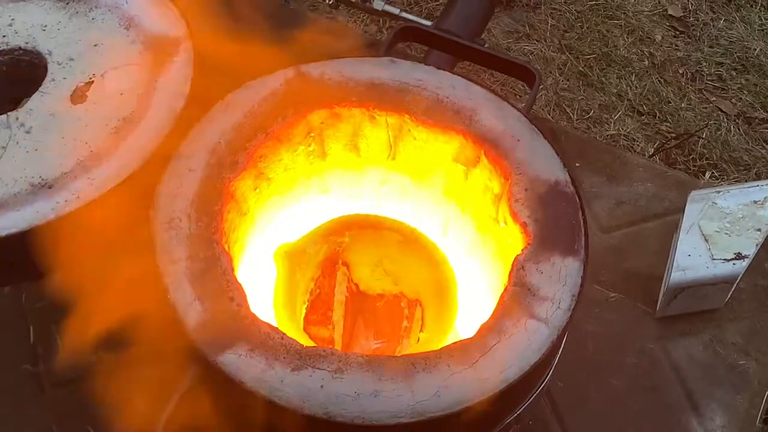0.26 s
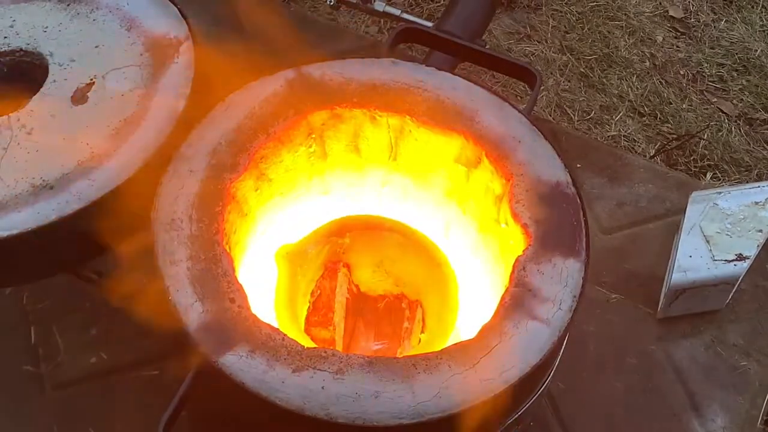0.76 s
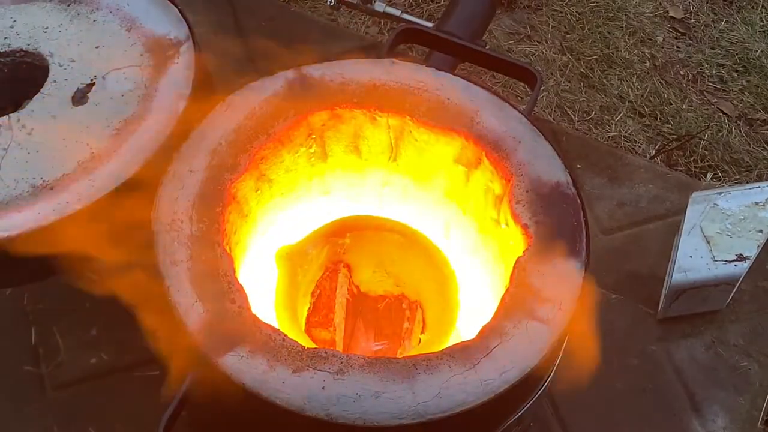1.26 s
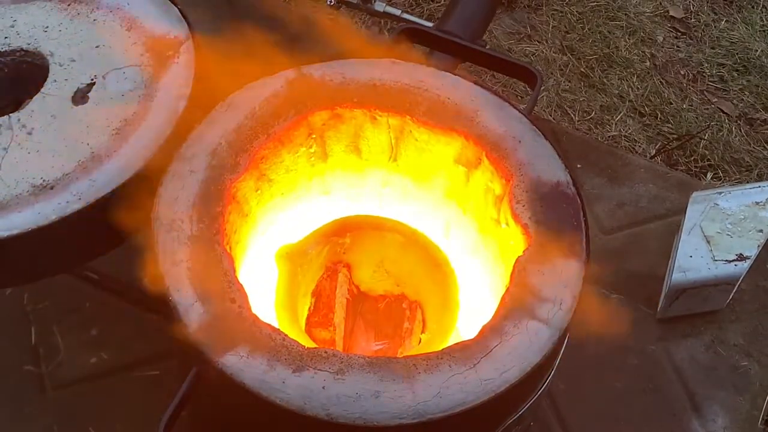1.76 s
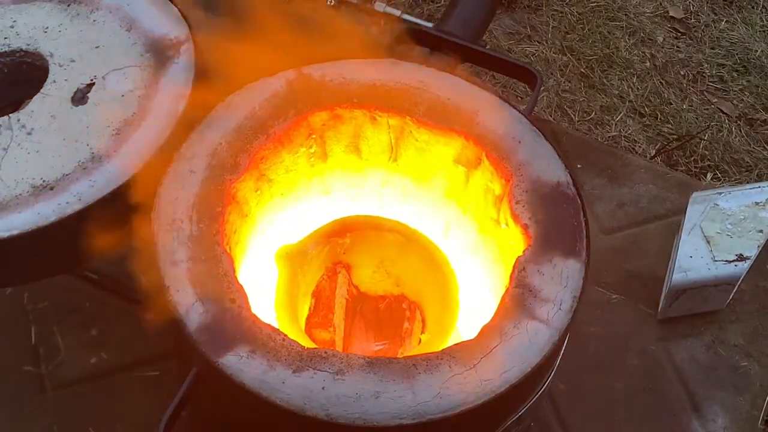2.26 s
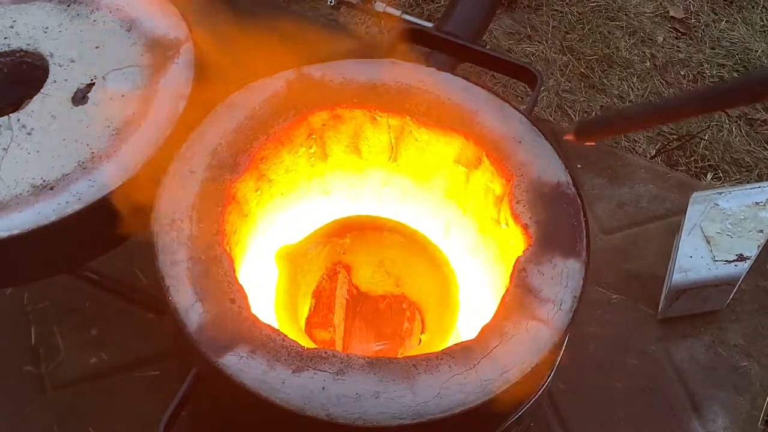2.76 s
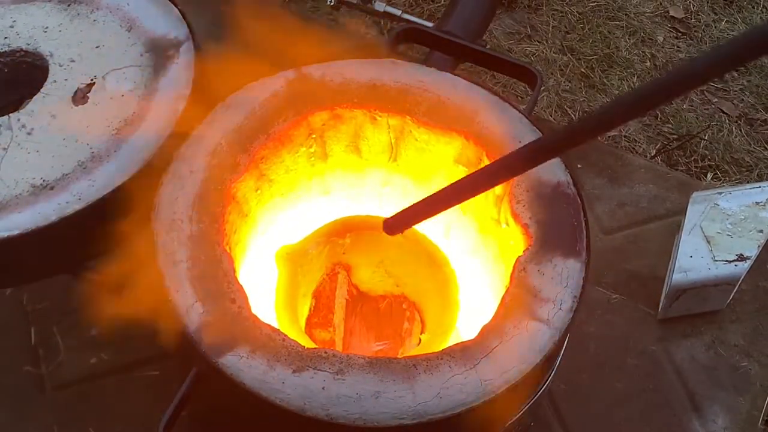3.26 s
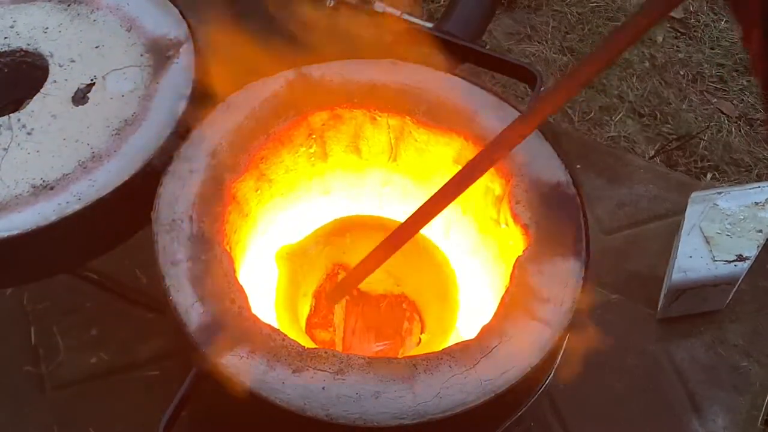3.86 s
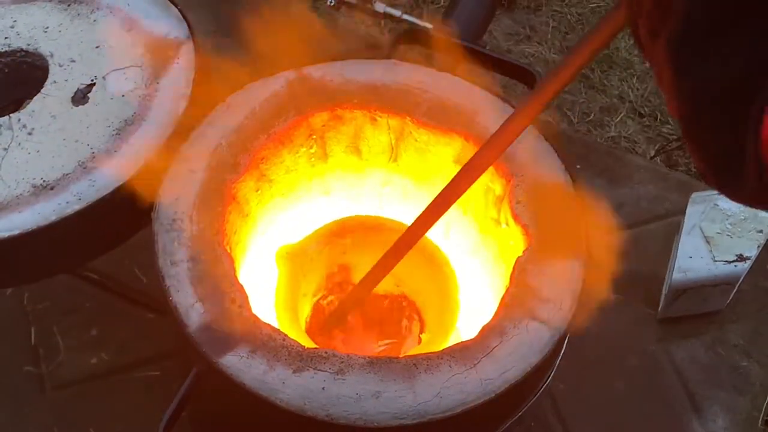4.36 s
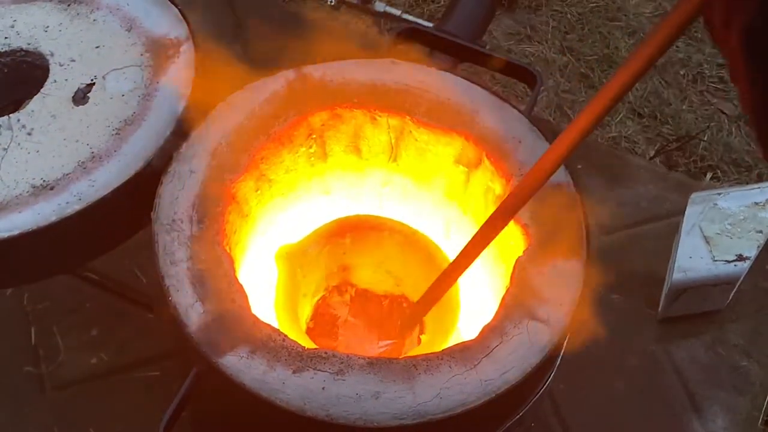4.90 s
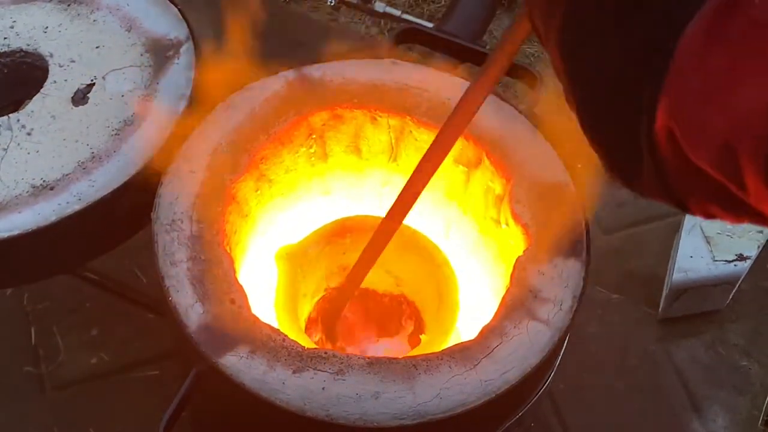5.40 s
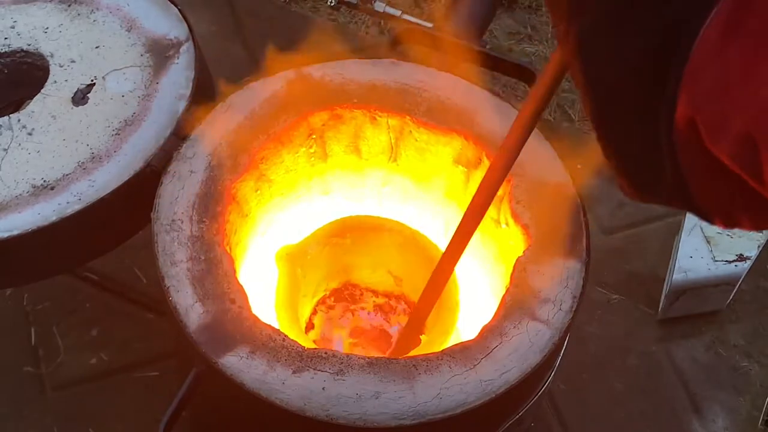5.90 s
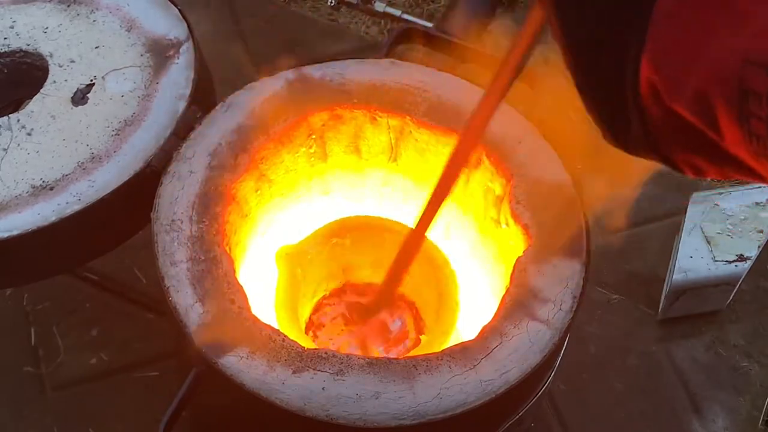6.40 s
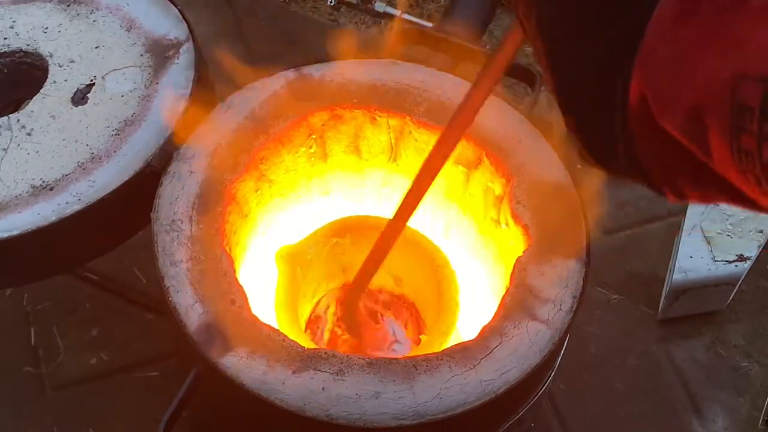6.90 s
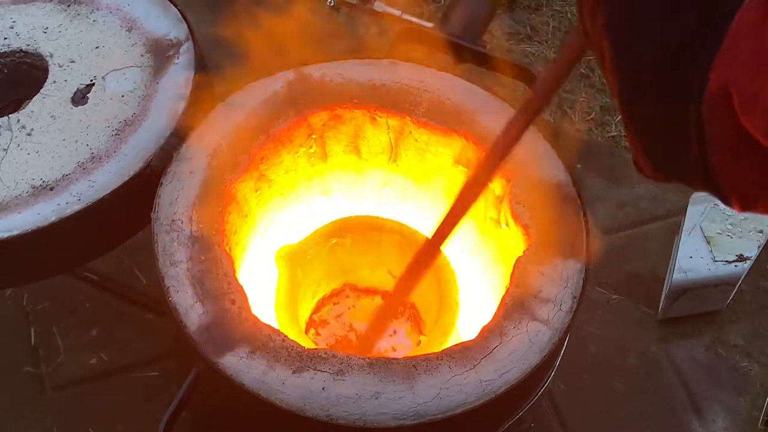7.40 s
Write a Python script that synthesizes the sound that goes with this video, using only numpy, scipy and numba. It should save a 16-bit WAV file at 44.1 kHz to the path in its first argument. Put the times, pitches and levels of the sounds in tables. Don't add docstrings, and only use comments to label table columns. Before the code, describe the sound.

A gas-fired pot furnace roars continuously for about 7.6 seconds in an open yard, heard very close from above in stereo with little surrounding space. The core is a broad, hollow low rush, strongest in the low and lower-middle range, wavering slightly but never stopping. From 0 to 2 seconds flame tips rustle over the rim in short gusts, with a notable puff near 0.9, and a bright, thin gas hiss with a very faint noisy whistle leans right. Around 2 seconds the rustle and hiss dip briefly, then recover. From about 3.8 to 5.2 seconds the hiss is shaded and duller, fluttering quickly as a worker's arm and rod cross. It reopens through 5.5 to 6.4, and rustling grows livelier, dips near 6.9, then swells fuller and brighter to the end, cutting off while still burning.

```python
import sys
import numpy as np
from scipy import signal
from scipy.fft import next_fast_len
from scipy.io import wavfile
from scipy.ndimage import uniform_filter1d, minimum_filter1d
from numba import njit

SR = 44100
rng = np.random.default_rng(int(sys.argv[2]) if len(sys.argv) > 2 else 0)


def digitize_waveform(pressure):
    field = np.atleast_2d(pressure).T
    bounded = np.clip(field, -1, 1)
    quanta = np.round(bounded * 32767).astype(np.int16)
    wavfile.write(sys.argv[1], SR, quanta)


def voltage_ratio(decibels):
    exponent = np.asarray(decibels, float) / 20
    return 10 ** exponent


N = 337310
HZ = np.maximum(np.fft.fftfreq(next_fast_len(N), 1 / SR), 0)

# [t/s, stretch of left port's lead, turn towards mouth 0-1]
SWING = [
    (0, 0.91, 0.02),
    (1.7, .8, .2),
    (2.7, 1.6, 0.9),
    (3.4, 1.3, 0.8),
    (4.8, 1.1, 0.9),
    (5.7, 1.3, 1),
    (6.5, 1, 1),
    (7.65, 0.9, .7),
]
# [t/s, jet lift (negative = shade)/dB]
SHADE = [(0, 3.5), (1.7, 0.5), (1.8, 0), (2.05, -4.5), (2.2, -0.5), (3.2, 1), (3.68, -3.5), (3.85, -11),
         (4.35, -12), (4.6, -11), (5.1, -10.5), (5.3, -7.5), (5.6, -5), (6.1, -3), (6.4, 0), (6.8, 1),
         (6.96, -3.5), (7.2, 0.5), (7.65, 0.5)]


def unit(x):
    return x / np.sqrt(np.mean(x ** 2))


def curves(table):
    t_s, *columns = np.transpose(table)
    return [np.interp(np.arange(N) / SR, t_s, c) for c in columns]


def over_hz(table):
    hz, *columns = np.transpose(table)
    return [np.interp(np.log(HZ + 1), np.log(hz), c) for c in columns]


def walk(rate_hz):
    hold = int(SR / rate_hz)
    steps = np.repeat(rng.standard_normal(N // hold + 1), hold)
    return unit(uniform_filter1d(uniform_filter1d(steps, hold), hold)[:N])


@njit
def ring(x, hz, width_hz):
    y, band, low = np.empty(len(x)), 0., 0.
    for i in range(len(x)):
        g, damping = np.tan(np.pi * hz[i] / SR), width_hz / hz[i]
        v = (band + g * (x[i] - low)) / (1 + g * (g + damping))
        band, low, y[i] = 2 * v - band, low + 2 * g * v, damping * v
    return y


def ports(gain, lead_rad, like, wander_rad):
    real, imag = rng.standard_normal((2, 3, len(HZ)))
    shared, left, right = gain * (HZ > 0) * (real + 1j * imag)
    like = np.clip(like, 0, 1)
    turn = np.exp(.5j * lead_rad)
    both = np.sqrt(like) * shared * np.array([turn, 1 / turn])
    both = both + np.sqrt(1 - like) * np.array([left, right])
    wander = np.exp(.5j * np.array([wander_rad, -wander_rad]))
    return np.real(np.fft.ifft(both)[:, :N] * wander)


def sides(pan_db):
    return voltage_ratio(np.array([pan_db, -pan_db]) / 2).reshape(2, -1)


def swells(middle_s, length_s, lift_db):
    phase = (np.arange(N) / SR - middle_s[:, None]) / np.reshape(length_s, (-1, 1))
    return lift_db @ np.cos(np.pi * np.clip(phase, -.5, .5)) ** 2


def pot(modes, drift, flicker_db, heat=0):
    out = 0
    for hz, width_hz, db, pan_db, lead_us, like in modes:
        centre_hz = hz * (1 + heat + drift * walk(2.976))
        lead_rad = 2 * np.pi * hz * lead_us / 7.1e5 * curves(SWING)[0]
        burn = ports(1, 0 * HZ, like, lead_rad)
        width_hz = 1.18 * width_hz
        rung = np.array([ring(ring(b, centre_hz, width_hz), centre_hz, width_hz) for b in burn])
        out = out + voltage_ratio(db + flicker_db * walk(5.3)) * sides(pan_db) * rung
    return unit(out)


def roar():
    # [f/Hz, width/Hz, level/dB, left minus right/dB, left lead/us, likeness 0-1]
    deep_modes = [(73.7, 44, -6.5, .3, 2.5, 0.88), (113, 66, -2.5, -1, 28, 1)]
    # [f/Hz, width/Hz, level/dB, left minus right/dB, left lead/us, likeness 0-1]
    low_modes = [(195.4, 70, 2, -1, 60, 1), (263.6, 103.5, -3, -0.5, 150, 1)]
    # [f/Hz, width/Hz, level/dB, left minus right/dB, left lead/us, likeness 0-1]
    mid_modes = [(333.5, 113, 0.15, 0.67, 190, 0.98), (441.5, 122, 0.23, 1, 132, 0.98)]
    # [f/Hz, width/Hz, level/dB, left minus right/dB, left lead/us, likeness 0-1]
    mouth_modes = [(538.7, 125, 0, 3.4, 74, 0.99)]
    # [f/Hz, width/Hz, level/dB, left minus right/dB, left lead/us, likeness 0-1]
    lip_modes = [(625, 90, 0, 2.5, 50, 1)]
    # [f/Hz, width/Hz, level/dB, left minus right/dB, left lead/us, likeness 0-1]
    upper_modes = [(794, 277, 1.5, 1.6, 31, 0.99), (985, 175, -3.5, 1.4, 92, 1)]
    # [f/Hz, width/Hz, level/dB, left minus right/dB, left lead/us, likeness 0-1]
    top_modes = [(1297, 143, 1, 4.8, 47, 0.96)]
    # [f/Hz, width/Hz, level/dB, left minus right/dB, left lead/us, likeness 0-1]
    edge_modes = [(1430, 110, 0, 3, 51, .95)]
    # [t/s, balance from mouth towards middle modes/dB]
    charge = [(0, -3), (.75, -1), (1.2, 1.5), (1.9, 1.5), (2.4, 0.5), (3.5, -1), (3.85, -3.5), (4.2, 2),
              (4.8, -1.5), (5.3, -0.5), (6.2, -0.5), (6.8, 1.5), (7.65, 1)]
    # [t/s, strength/dB]
    column = [(0, 0.5), (.55, 0), (.95, 1), (1.25, -1.5), (1.7, -1.5), (2, -3), (2.5, 0), (2.8, -2),
              (3.3, 0), (3.6, -1), (3.9, -5), (4.3, -1), (4.7, -1), (5.1, -3), (5.8, 1.5), (6.0, 0),
              (6.35, 3), (6.7, 1), (7.0, 1.5), (7.45, 3.5)]
    # [t/s, surge/dB, left minus right/dB]
    surge = [(0, 1, 0), (.4, -0.5, 0), (.9, -1, .5), (1.4, 1.5, -.5), (2, -0.5, 0.2), (2.6, 0, 0),
             (2.95, 1.5, 0.3), (3.5, -1, 0), (4.2, 0.5, 0.5), (4.6, 0.5, 0), (5.0, 0, -.3), (5.7, 0, -.5),
             (6.1, 0.5, -.5), (6.6, 0, -.6), (7.0, -1, -.6), (7.65, 3, -.6)]
    # [t/s, strength/dB, pitch shift/%]
    filling = [(0, -2, 0), (.5, -0.5, 0), (.95, 0, -0.081), (1.2, -5, -1), (1.7, -2, -1), (1.9, -5, 0),
               (2.4, 0, 0), (2.8, -2, 0.075), (3.1, 1, 0), (3.6, 1, 0), (3.95, 0.5, 0), (4.65, 1, -0.099),
               (5.0, -1, 0), (5.6, 0, 0), (6.25, 1.5, 0), (6.9, 1, 1), (7.2, 1.5, 1), (7.65, 1, 0.091)]
    # [t/s, strength/dB]
    licking = [(0, 4), (.5, 3), (.9, 2), (1.1, -1), (1.6, 2), (1.9, -3), (2.4, 0), (2.9, -1), (3.6, 1),
               (4.0, -1), (4.4, 1), (4.9, -1), (5.5, -1), (6.1, 1), (6.4, 0), (7.0, 0), (7.65, 1)]

    (shade_db,), (column_db,), (charge_db,) = curves(SHADE), curves(column), curves(charge)
    (surge_db, lean_db), (filling_db, shift_pct), (lick_db,) = curves(surge), curves(filling), curves(licking)
    turn = curves(SWING)[1] - .6
    mid_db = -3 + 0.16 * shade_db + charge_db
    mouth_db = -7.5 + 0.27 * shade_db - 1.1 * np.minimum(charge_db, 0)
    upper_db = -15 + 0.17 * shade_db + 0.53 * column_db
    top_db = -26.5 + column_db + filling_db
    edge_db = -39 + 2.2 * column_db
    heat = 0.0236 * column_db
    mouth_heat = 0.04 * charge_db

    modes = voltage_ratio(surge_db) * sides(0.8 * turn) * pot(low_modes, drift=0.032, flicker_db=0.1)
    modes = modes + voltage_ratio(mid_db) * sides(-turn) * pot(mid_modes, drift=0.032, flicker_db=-0.16)
    modes = modes + voltage_ratio(mouth_db) * sides(4 * turn - .8) * pot(mouth_modes, 0.016, 0.28, mouth_heat)
    modes = signal.sosfilt(signal.butter(2, 850, fs=SR, output="sos"), modes)
    modes = modes + voltage_ratio(upper_db) * pot(upper_modes, 0.022, 0.46, heat)
    modes = modes + voltage_ratio(top_db) * pot(top_modes, 0.006, 0.55, 0.22 * heat + shift_pct / 100)
    modes = modes + voltage_ratio(edge_db) * pot(edge_modes, .006, .6)
    modes = modes + voltage_ratio(-20 + lick_db) * pot(lip_modes, .015, .4)
    modes = modes - .22 * np.array([ring(m, 1160 + 0 * heat, 90.) for m in modes])
    modes = voltage_ratio(-15) * modes + voltage_ratio(-26.5) * pot(deep_modes, drift=0.028, flicker_db=2.5)
    rim = signal.cheby1(6, .5, 1450, fs=SR, output="sos")
    return sides(-.6 - .5 * turn + lean_db) * signal.sosfilt(rim, modes)


def gusts():
    # [middle t/s, length/s, lift of tongues/dB, lift of jet/dB]
    gust_table = [(0.132, 0.19, 1, 0), (.45, 0.3, 6, 1), (0.895, 0.17, 11, 2.5), (1.063, .15, 5, 2.5),
                  (1.42, 0.23, 3, 3), (1.679, 0.29, 5.5, 3.5), (2.297, 0.24, 4, 0), (2.592, .13, 5, 0.5),
                  (2.778, 0.11, 0.5, 0), (3.255, 0.28, 2.5, 0), (3.686, 0.4, 2, 1), (3.943, 0.15, -3, 6),
                  (4.244, 0.16, 4.5, 3.5), (4.65, .25, 0, 4.5), (4.975, 0.21, 7, 5.5), (5.165, .12, 3, 3.5),
                  (5.321, .25, 4.5, 2.5), (5.659, .2, 4, 2.5), (5.816, 0.092, 5, 6), (5.95, 0.15, 3, 4),
                  (6.276, 0.29, 2, 3), (6.481, .1, -3, -2.5), (6.59, 0.15, 5.5, 7), (6.898, .1, -3.5, -1.5),
                  (2.1, .12, -5.5, 1), (3.141, .08, -5.5, -0.5), (5.56, .1, 1, 0.5), (6.807, 0.34, 3, 1),
                  (7.096, 0.12, 4.5, 5), (7.292, 0.16, 3.5, 3.5), (7.44, 0.24, 3.5, 4),
                  (7.611, 0.14, 0.5, 1.5)]
    # [t/s, lift/dB]
    flickers = [(.3, -1), (.66, 1.5), (.76, 1), (1.3, 1), (1.55, 3), (2.22, 3), (2.37, 2), (2.86, 1),
                (3.0, 0), (3.45, -1.5), (3.72, 2), (3.85, 4.5), (4.1, 2), (4.52, 6), (4.88, 3.5), (5.0, 0),
                (5.53, 0.5), (6.06, 0), (6.14, 0), (6.45, -2.5), (6.93, 0), (6.68, 0.5), (6.86, -0.5),
                (7.03, 2), (7.2, 2.5), (7.37, -2.5), (7.5, 5.5), (7.55, -0.5)]
    middle_s, length_s, tongue_db, jet_db = np.transpose(gust_table)
    moment_s, flicker_db = np.transpose(flickers)
    jet_lift_db = swells(middle_s, length_s, jet_db) + swells(moment_s, .09, flicker_db)
    return swells(middle_s, length_s, tongue_db), jet_lift_db


def tongues():
    # [f/Hz, level per Hz/dB, left lead/rad, likeness 0-1]
    rustle_colour = [(1300, -17.5, .3, 0.96), (1660, -3.5, 0.66, .95), (1870, -1, 0.85, .85),
                     (2190, 4, 0.66, 0.9), (2540, 1.5, 0.86, .92), (2695, 3.5, 1.4, 0.92),
                     (3330, -2.5, 1.8, .85), (4240, -8, 0.91, .85), (5130, -10.5, 2.2, 0.6),
                     (6250, -15, 1.9, 0.6), (8000, -61.5, 1.5, .4)]
    # [t/s, reach/dB]
    reach = [(0, 3.5), (.7, .5), (1.2, -0.5), (2.0, -4.5), (2.6, -2), (3.1, -2), (3.2, 0.5), (3.75, -4),
             (4.05, -5), (4.35, -9.5), (4.85, -7.5), (5.3, -3.5), (6.15, 1), (6.3, 6), (6.85, 4.5),
             (6.97, -0.5), (7.1, 2.5), (7.65, 8.5)]
    # [t/s, tilt/(dB/octave)]
    tearing = [(0, 0), (.35, -4), (.95, -2), (1.3, -2.5), (2.0, -0.5), (2.8, 0), (3.3, 0.5), (3.55, 3.5),
               (3.9, 0), (4.3, -3), (4.9, -2), (5.5, -0.5), (6.1, 4.5), (6.5, 2), (6.9, 1.5), (7.3, 2.5),
               (7.65, 0.5)]
    # [t/s, fizz/dB]
    fizz = [(0, 1.5), (.4, -3), (.9, -2), (1.3, 0.5), (1.9, -1), (2.6, 0), (3.2, -1.5), (3.7, -1.5),
            (4.1, -2.5), (4.5, 1), (4.9, -2.5), (5.3, 0), (5.6, 1.5), (6.1, 2.5), (6.45, -0.5), (6.9, -1.5),
            (7.3, 1.5), (7.65, 1)]

    (shade_db,), (tilt_db,), (fizz_db,) = curves(SHADE), curves(tearing), curves(fizz)
    tongue_db, jet_db = gusts()
    tongue_db, jet_db = tongue_db + curves(reach)[0], jet_db + shade_db
    level_db, pan_db = -53 + tongue_db, -2.6 + 0.52 * walk(10)
    bright_db = -3.5 + 0.9 * (jet_db - tongue_db)
    patchy_db = 2.0 + .1 * np.maximum(-shade_db, 0)
    colour_db, lead_rad, like = over_hz(rustle_colour)
    stretch = curves(SWING)[0]
    out = 0
    for hz in 1400 * 2 ** np.arange(0, 2.5, 1 / 5):
        band = np.cos(np.pi / 2 * np.clip(5 * np.log2((HZ + 1) / hz), -1, 1))
        tilt_octaves = np.clip(np.log2(hz / 2400), -.6, .6) * np.clip((5600 - hz) / 1500, 0, 1)
        fizz_share = np.exp(-(np.log2(hz / 3740) / .5) ** 2)
        brightness_db = np.clip((hz - 2700) / 1500, 0, 1) * (bright_db + 6.5)
        brightness_db = brightness_db + tilt_octaves * tilt_db + fizz_share * fizz_db
        wander_rad = hz / 3000 * (.6 * walk(8) + .9 * (stretch - 1))
        patch = ports(voltage_ratio(colour_db) * band, lead_rad, like, wander_rad)
        out = out + voltage_ratio(patchy_db * walk(11) + brightness_db) * patch
    steady = voltage_ratio(-62 + 0.3 * jet_db) * unit(ports(voltage_ratio(colour_db), lead_rad, like, 0.7 * walk(4.2)))
    rustle = voltage_ratio(level_db + 2.5) * unit(out) + steady
    late = np.arange(N) - SR * (0.0028 + .00006 * walk(1.6))
    echo = np.array([np.interp(late, np.arange(N), r) for r in rustle])
    return sides(pan_db) * (rustle + 0.33 * echo)


def jet():
    # [f/Hz, level per Hz/dB]
    hiss_colour = [(3500, -11), (5200, -4.5), (6300, 4), (7300, 6), (8600, 7), (10000, -0.5), (11500, -1.5),
                   (13000, -1), (15000, 1), (16500, -9.5)]
    # [f/Hz, width/Hz, level/dB]
    whistles = [(10637, 210, -1.5), (7255, 110, -9)]
    # [t/s, lift/dB]
    flutters = [(3.83, 1), (3.97, 1), (4.08, 1.5), (4.16, -0.5), (4.22, 0), (4.28, 2), (4.38, -2),
                (4.45, 0), (4.51, 0.5), (4.57, 1), (4.62, -1.5), (4.67, 1.5), (4.74, -1), (4.8, 2.5),
                (4.88, 1.5), (4.93, -1.5), (4.99, 1), (5.08, -1), (5.15, 1.5), (5.22, 0), (5.28, -0.5),
                (5.38, -0.5), (5.45, 0.5), (5.52, 0.5), (5.57, 0), (5.62, 1), (5.68, 1), (5.74, -1),
                (5.79, 1)]

    shade_db = curves(SHADE)[0]
    moment_s, flutter_db = np.transpose(flutters)
    clear_db = shade_db + gusts()[1] + swells(moment_s, .06, flutter_db)
    clear_db = clear_db + (0.63 + .05 * np.maximum(-shade_db, 0)) * walk(25)
    hiss_db, lower_db = -56.5 + clear_db, -1.5 + 0.33 * clear_db
    leaning = np.clip((np.arange(N) / SR - 3.75) / 2, 0, 1)
    whistle_db = -4 + .1 * clear_db - 2.5 * leaning

    colour = voltage_ratio(over_hz(hiss_colour)[0])
    in_phase_hz, turn_hz, like = 6240, 4780, .93
    lead_rad = -2 * np.pi * (HZ - in_phase_hz) / turn_hz
    sway_rad = .06 * walk(15) - .15 * (np.arange(N) / N - .3)
    bend_rad = .018 * np.clip(shade_db, -9, 0)
    upper = np.clip((HZ - 7500) / 2000, 0, 1)
    high = ports(colour * np.sqrt(upper), lead_rad, like, sway_rad)
    high = high * voltage_ratio(1.5 * walk(32) + .7 * walk(13))
    low = ports(colour * np.sqrt(1 - upper), lead_rad, like, sway_rad + bend_rad)
    low = low * voltage_ratio(1.4 * walk(14)) * sides(-1.3)
    lines = sum(voltage_ratio(db) / (1 + (2 * (HZ - hz) / width_hz) ** 2) for hz, width_hz, db in whistles)
    whistle = unit(ports(lines, lead_rad, like, sway_rad))
    whistle = voltage_ratio(2.0 * (whistle_db + 9.5) - 14.5 + 2.2 * walk(14)) * whistle
    return voltage_ratio(hiss_db) * (voltage_ratio(6.0) * unit(high) + voltage_ratio(lower_db + 2.0) * unit(low) + whistle)


def scene():
    return roar() + tongues() + jet()


def roll_off(x):
    return signal.sosfilt(signal.butter(12, 15880, fs=SR, output="sos"), x)


def record(dry):
    dry = signal.sosfilt(signal.butter(3, 48, "high", fs=SR, output="sos"), dry)
    peak = uniform_filter1d(-minimum_filter1d(-abs(dry).max(axis=0), size=441), size=441)
    limited = dry / np.maximum(peak / .9, 1)
    return roll_off(limited)


dry = scene()
out = record(dry)
digitize_waveform(out)
```